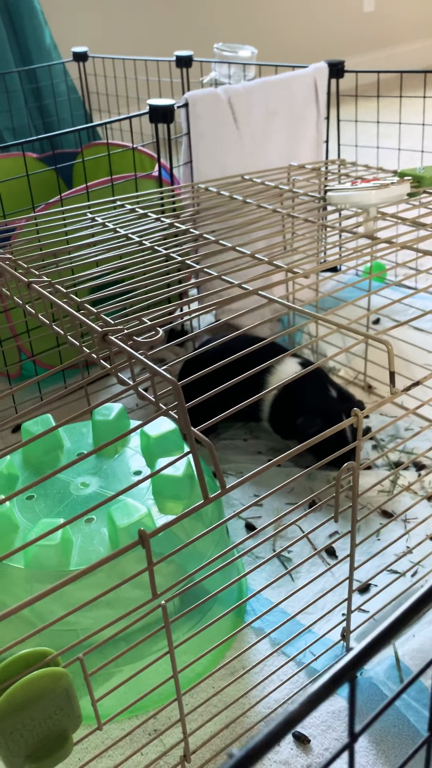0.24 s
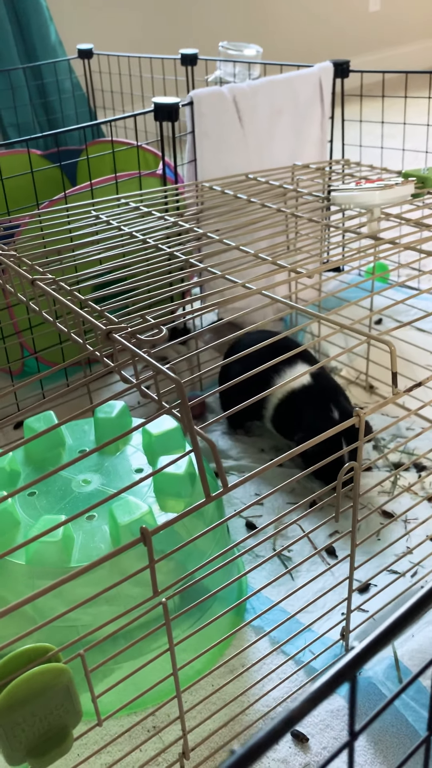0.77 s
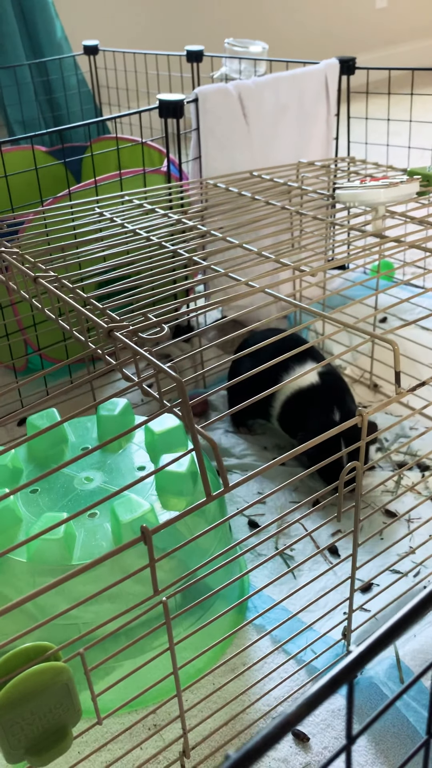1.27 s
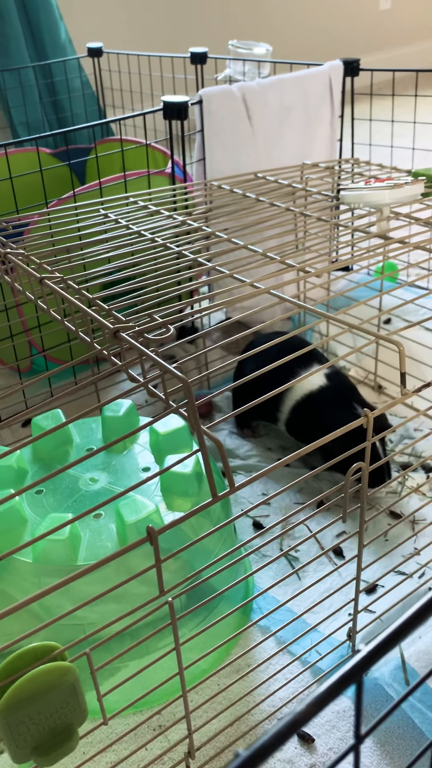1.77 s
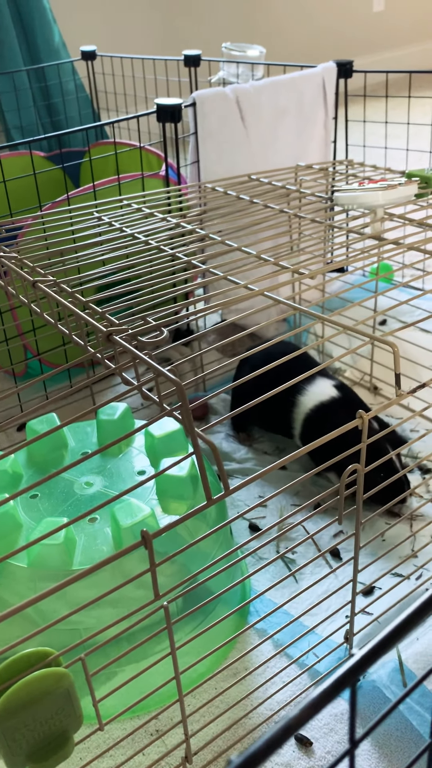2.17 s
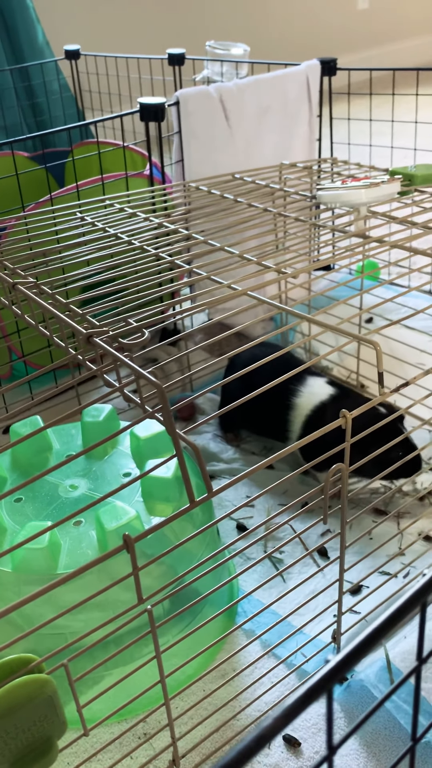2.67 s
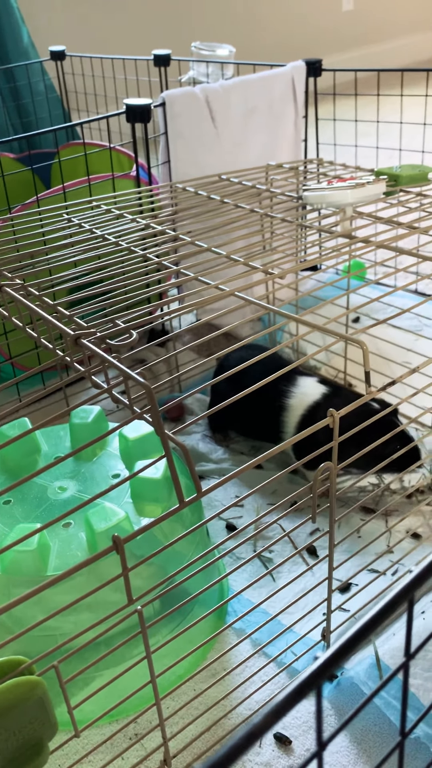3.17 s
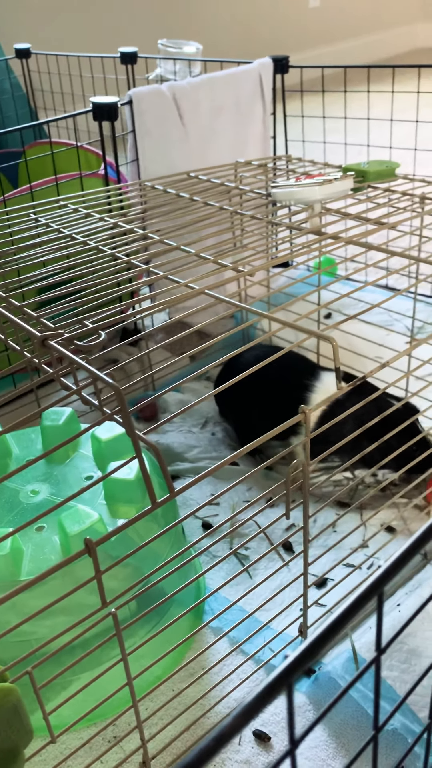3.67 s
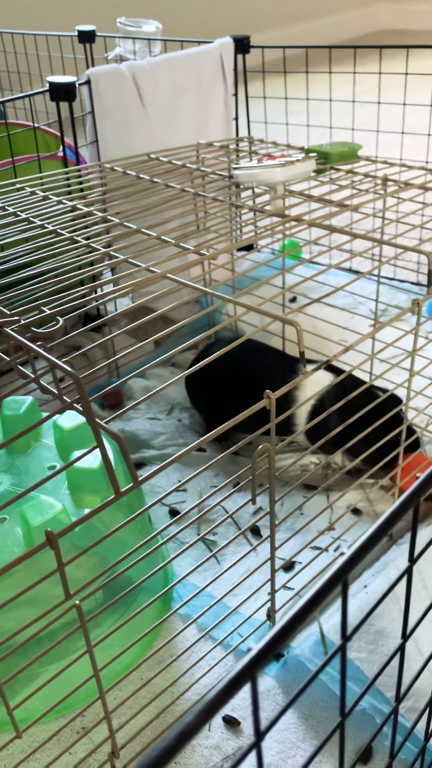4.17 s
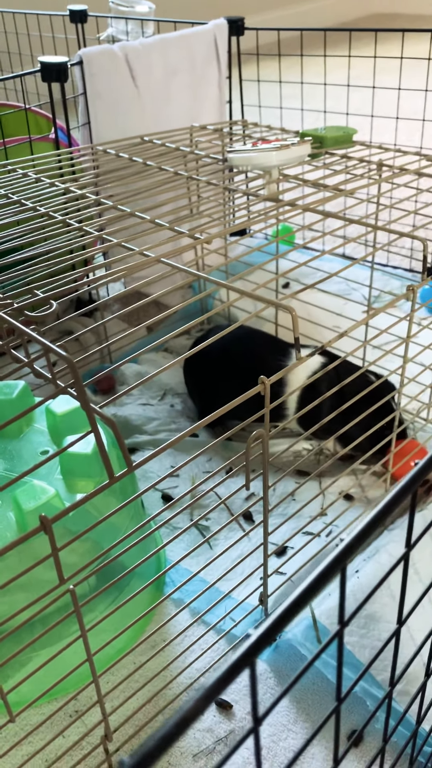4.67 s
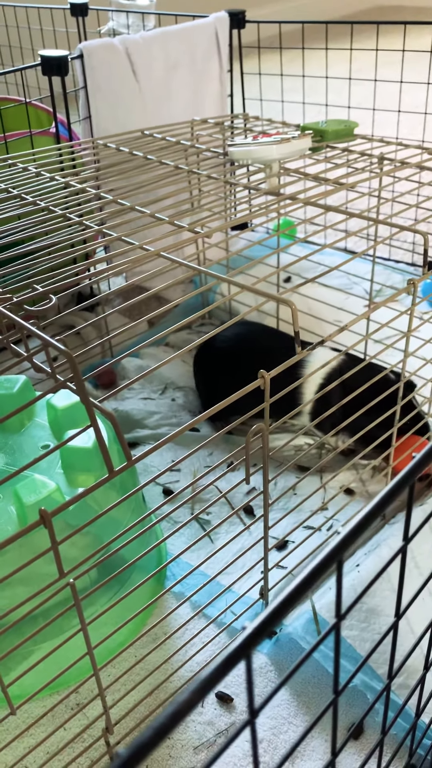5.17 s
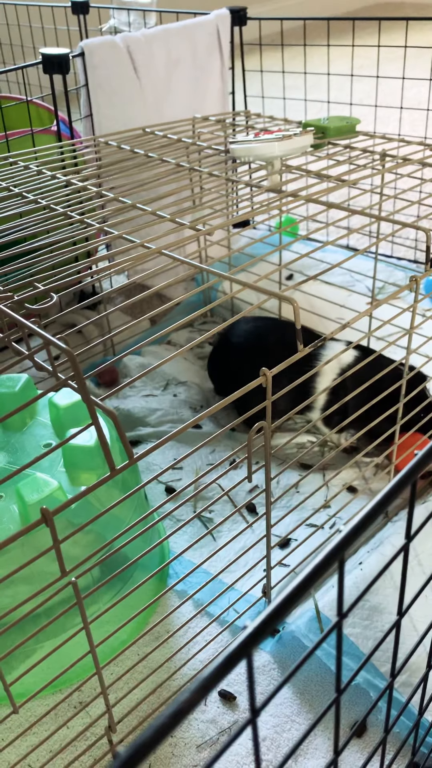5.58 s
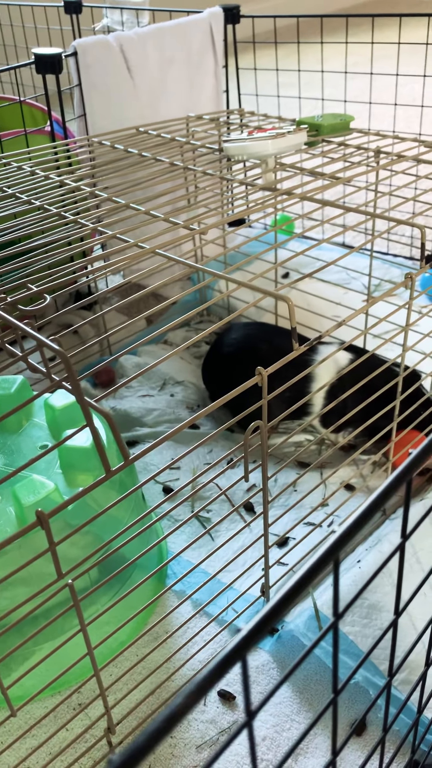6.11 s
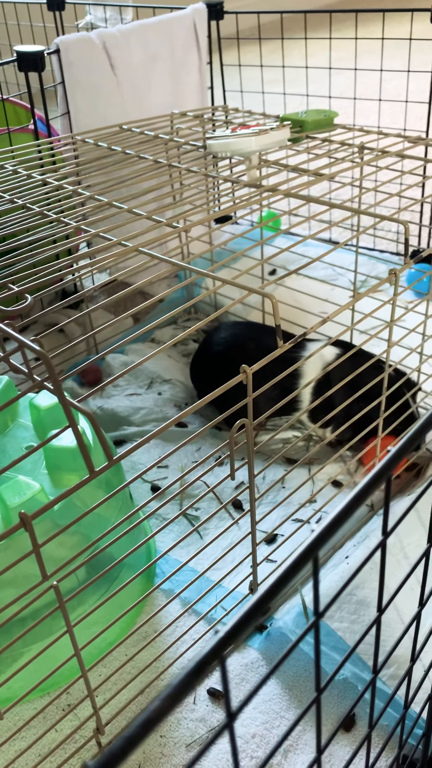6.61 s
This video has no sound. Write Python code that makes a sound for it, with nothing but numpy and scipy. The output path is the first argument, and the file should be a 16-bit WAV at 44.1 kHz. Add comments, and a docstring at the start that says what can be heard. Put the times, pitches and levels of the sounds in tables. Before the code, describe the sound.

Close, delicate hay rustling and stalk snaps come in uneven flurries as a small animal noses about, above a faint deep motor hum.

```python
"""A guinea pig roots through hay on a padded cage floor, heard by a close pair of microphone ports.
A low motor hum and the room's air run throughout. From 0.2 s nose and paws drag stalks (fine fizz, crisp
kinks) and crumple bedding (dull crackle), while single stalks snap and the pad pops: a flurry by 0.8 s,
bursts near 1.2 and 2 s, a lull, the busiest spell from 3.2 to 4.4 s, then more near 5.2 and 6.5 s.
Random stick-slip clicks make the rustle, band-limited releases the snaps, dispersed clicks the pops."""
import sys
import numpy as np
from scipy import signal
from scipy.fft import rfft, irfft
from scipy.io import wavfile
from scipy.ndimage import uniform_filter1d

SR = 44100
rng = np.random.default_rng(int(sys.argv[2]) if len(sys.argv) > 2 else 0)


def master(y):
    """Save y as 16-bit WAV."""
    cut = np.clip(np.atleast_2d(y).T, -1, 1)
    pcm = np.round(cut * 32767)  # scale
    wavfile.write(sys.argv[1], SR, pcm.astype(np.int16))


N = 302085
TIME = np.arange(N) / SR
BINS = np.fft.rfftfreq(N, 1 / SR)
LEAD = 256  # samples of room before a click's peak
SNAP_TOP_HZ = 11900
# lag of 500 Hz behind 2 kHz across the pad, for the bedding and a pop at the reference centre
PAD_LAG_S = 0.003095
IDLE_HAY_DB, IDLE_BEDDING_DB = -87, -87  # the animal is never quite still


# colour of the hay fizz as it reaches the listener: (f/Hz, relative level/dB per Hz)
HAY_COLOUR = [(600, -8.5), (2000, 0), (3200, -10), (4500, -1), (6500, -1.5), (9500, 0), (11300, -2.5),
              (13500, -10), (16000, -2)]


def hay(level_db=0.35, coarse_db=-6.0):
    """Stalks slide over each other: a dense stick-slip fizz with coarser catches."""
    _, _, slide_db, _ = np.transpose(SHOVES)
    fine = slips(per_s=9800, spread_db=1.5)
    coarse = slips(per_s=330, spread_db=2.5)
    grains = unit(fine) + amp(coarse_db) * unit(coarse)
    fizz = shifting(colour(grains, HAY_COLOUR), depth_db=2.0, size=7, count=8)
    return fizz * amp(level_db) * movement(slide_db, IDLE_HAY_DB)


# colour of the crumpling bedding as it reaches the listener: (f/Hz, relative level/dB per Hz)
BEDDING_COLOUR = [(120, -22.5), (350, 9), (550, 2.5), (720, -1.5), (980, 0.5), (1300, -3.5), (1900, -4.5),
                  (2500, -17), (4500, -12.5), (9000, -24)]


def bedding(level_db=2.5):
    """The soft floor crumples under the animal's weight in dull, separate creases."""
    _, _, _, crumple_db = np.transpose(SHOVES)
    clicks = slips(per_s=520, spread_db=0.0)
    creases = colour(bend(clicks, PAD_LAG_S), BEDDING_COLOUR)
    crumple = shifting(creases, depth_db=3.5, size=3, count=7)
    return crumple * amp(level_db) * movement(crumple_db, IDLE_BEDDING_DB)


# each shove of the nose or a paw:
# (t/s, time held/s, sliding hay level/dB, crumpling bedding level/dB), levels before each layer's trim
SHOVES = [(0.21, 0.041, -79.5, -84.5), (0.408, 0.011, -77, -75.5), (0.572, 0.0066, -63.5, -70.5),
          (0.647, 0.027, -61.5, -61), (0.692, 0.03, -85, -68.5), (0.814, 0.011, -69, -69.5),
          (1.167, 0.082, -78, -81), (1.684, 0.012, -78.5, -77.5), (1.807, 0.017, -75.5, -79),
          (1.87, 0.034, -91, -76.5), (1.927, 0.033, -72, -70.5), (2.018, 0.025, -63, -69.5),
          (2.08, 0.012, -68, -88), (2.585, 0.062, -77, -95), (3.225, 0.028, -73, -76),
          (3.32, 0.03, -78, -76.5), (3.37, 0.076, -66.5, -66), (3.408, 0.012, -61.5, -72),
          (3.475, 0.045, -69, -77), (3.534, 0.0025, -58.5, -62.5), (3.59, 0.051, -74, -101),
          (3.682, 0.036, -67, -83), (3.725, 0.022, -91, -67.5), (3.8, 0.3, -88, -88.5),
          (4.081, 0.016, -66.5, -72.5), (4.13, 0.053, -69, -79.5), (4.219, 0.023, -73, -75),
          (4.335, 0.014, -76, -71), (4.97, 0.013, -75, -91), (5.028, 0.038, -71, -78.5),
          (5.115, 0.036, -87, -71.5), (5.2, 0.067, -80, -72), (5.456, 0.0028, -66.5, -66),
          (5.56, 0.058, -66, -71.5), (6.25, 0.37, -88.5, -89.5), (6.46, 0.022, -88, -81),
          (6.597, 0.012, -79, -77)]
RISE_S, SETTLE_S = 0.019, 0.025  # time in which a shove builds by, and dies away by, 10 dB
STIR_DB, STIR_DB_PER_S = -14.5, 97  # neighbouring stalks stir more faintly before and after it
FIDGET_DB = -1


def movement(levels_db, idle_db):
    """Gain of a rustle: each shove builds, holds and settles, over a faint, uneven fidgeting."""
    t = TIME[::64]
    fidget = colour(rng.standard_normal(N), [(1, 0), (8, 0), (40, -90)])[::64]
    power = amp(idle_db + FIDGET_DB * fidget) ** 2
    for (start, held, _, _), db in zip(SHOVES, levels_db):
        before = np.maximum(start - t, 0)
        after = np.maximum(t - start - held, 0)
        power += amp(db - 10 * (before / RISE_S + after / SETTLE_S) ** 2) ** 2
        power += amp(db + STIR_DB - STIR_DB_PER_S * (before + after)) ** 2
    return np.interp(TIME, t, np.sqrt(power))


def crackle(level_db=-2, per_s=125, low_hz=900, high_hz=4600, count=10):
    """Trapped stalks kink one by one during a shove: crisp clicks, each stalk in its own band."""
    _, _, slide_db, crumple_db = np.transpose(SHOVES)
    kinks = np.zeros(N)
    for hz in np.geomspace(low_hz, high_hz, count):
        kink = crack(hz, 2 * hz, splinter=0.1, splinter_s=0.001)
        clicks = slips(per_s / count, spread_db=-1.5)
        kinks += signal.oaconvolve(clicks, kink)[LEAD:LEAD + N]
    gain = movement((slide_db + crumple_db) / 2, IDLE_BEDDING_DB + STIR_DB)
    return amp(level_db) * unit(kinks) * gain


def ticks(per_s=22, over_db=4.0, low_hz=3200):
    """Fine fibres give way at random, as loudly as the hay is being pushed."""
    _, _, slide_db, _ = np.transpose(SHOVES)
    breaks = slips(per_s, spread_db=1.5) * movement(slide_db, IDLE_HAY_DB)
    tick = crack(low_hz, SNAP_TOP_HZ, splinter=0.53, splinter_s=0.001)
    return amp(over_db) * signal.oaconvolve(breaks, tick)[LEAD:LEAD + N]


# dry stalks snapping; thinner stalks start higher, all reach the same top:
# (t/s, tick level/dB as rms over 1 ms before the ports, lowest f/Hz,
#  jolt to the neighbours level/dB re the tick, splintering 0-1)
SNAPS = [(0.6388, -54, 5000, -13, 1), (0.648, -55.5, 5200, -2, 1), (1.1708, -63, 2300, -2, 0.3),
         (1.2156, -61, 3600, -5, 0.7), (1.2208, -55.5, 4000, -4, 0.3), (1.2343, -57, 2200, -11, 0.5),
         (1.5252, -59, 2860, -15, 0.2), (1.5935, -58, 8800, -11, 0.2), (1.736, -63.5, 6200, -6, 0.4),
         (1.992, -67, 2700, -1, 0.3), (2.0107, -49, 4800, -2.5, 0.4), (2.035, -51, 5100, -5, 0.8),
         (2.0655, -52, 6300, -10, .2), (3.288, -68.5, 2500, 9.5, 0.5), (3.37, -61.5, 3000, 6, 0.83),
         (3.39, -51, 3000, -10, 0.7), (3.407, -53.5, 3500, 0, 0.7), (3.5318, -50.5, 3140, 2, 0.5),
         (3.7188, -53.5, 4300, -20, 1), (3.728, -56, 4300, -5, 0.5), (3.8305, -57, 4930, -24, 0.2),
         (4.0962, -59, 5130, -9, 0.2), (4.1585, -58, 6500, -9, .3), (4.232, -62, 2600, 3, .5),
         (4.3375, -57, 4630, -11, 0.7), (5.0273, -59, 6200, -15, 0.5), (5.158, -64, 7550, -7, 0.2),
         (5.2144, -66, 6500, -12, .2), (5.56, -62, 5000, -9, .4), (5.6295, -51.5, 6300, -19, 0.6),
         (5.7523, -69, 3000, 4.5, .1), (6.3193, -59, 9050, -17, 0.16), (6.5703, -64.5, 4960, 3.5, 0.1),
         (6.6783, -54, 8900, -28, 0)]


def snaps(level_db=0.0, jolt_low_hz=1200, jolt_top_hz=7000):
    """Dry stalks break with a thin tick, clean or splintering, and jolt their neighbours lower down."""
    out = np.zeros(N)
    for s, db, low_hz, jolt_db, splinter in SNAPS:
        tick = crack(low_hz, SNAP_TOP_HZ, splinter, splinter_s=0.0015)
        jolt = crack(jolt_low_hz, jolt_top_hz, splinter, splinter_s=0.0036)
        snap = tick + amp(jolt_db) * jolt
        add(out, s - LEAD / SR, amp(db + level_db) * snap)
    return out


# the floor pad popping under a paw: (t/s, level/dB as rms over 1 ms before the ports, centre f/Hz)
POPS = [(0.4038, -60, 1830), (0.417, -63, 1700), (0.581, -69, 1500), (0.6385, -58, 1520),
        (0.648, -57, 1500), (0.6700, -50, 1430), (0.6723, -46, 950), (0.687, -61, 597), (0.736, -66, 1510),
        (0.7767, -62, 980), (0.7937, -52.5, 940), (1.17, -62.5, 1800), (1.234, -52.5, 1740),
        (1.696, -65, 1400), (1.893, -67, 900), (1.926, -66, 1640), (1.9745, -51.5, 1430),
        (1.977, -49.5, 646), (2.0123, -56, 1690), (2.037, -61, 950), (2.0675, -61, 1000),
        (2.659, -65, 1050), (2.678, -65, 1410), (3.223, -63, 1580), (3.369, -65, 1590), (3.4113, -44, 890),
        (3.4208, -52, 1180), (3.43, -50, 990), (3.4498, -53, 1080), (3.5144, -51.5, 1970),
        (3.5344, -44, 640), (3.7184, -44.5, 1160), (3.7287, -49, 1370), (4.0885, -60, 1090),
        (4.097, -59, 1250), (4.1895, -68, 1260), (4.23, -60.5, 2030), (4.3245, -72, 1690),
        (5.06, -65, 1630), (5.0945, -57.5, 1190), (5.126, -58, 1300), (5.1327, -57, 1260),
        (5.1565, -62, 1070), (5.1955, -62, 840), (5.208, -56, 625), (5.219, -53, 527), (5.2432, -55, 1590),
        (5.4495, -66, 1050), (5.4622, -53.5, 1230), (6.456, -64.5, 930), (6.478, -69, 930),
        (6.589, -58, 2230), (6.606, -69, 1320)]
# colour of a pop centred on POP_CENTRE_HZ: (f/Hz, relative level/dB per Hz)
POP_COLOUR = [(120, -21), (380, -8), (900, 5.5), (1400, -2), (2000, -8), (2800, -21), (12000, -45)]
POP_CENTRE_HZ = 1000


def pops(level_db=0.0):
    """The pad buckles under a paw: a papery knock that falls in pitch within a few milliseconds."""
    out = np.zeros(N)
    for s, db, hz in POPS:
        dullness = POP_CENTRE_HZ / hz
        push = release(splinter=0.1, splinter_s=0.003)
        push_hz = np.fft.rfftfreq(len(push), 1 / SR)
        shape = amp(read(POP_COLOUR, push_hz * dullness))
        knock = irfft(rfft(push) * shape)
        # duller pops come from farther across the pad and lag more
        knock = bend(knock, PAD_LAG_S * np.sqrt(dullness))
        add(out, s - LEAD / SR, amp(db + level_db) * per_ms(knock))
    return out


# phase by which the left channel leads the right: (f/Hz, phase/rad), negative where it trails
CHANNEL_LEAD = [(100, 0), (1000, -.5), (2150, .25), (2600, 2), (4100, 2), (5000, 3.1), (7500, 6.1),
                (9300, 6.6), (11300, 9.2), (13000, 9.7), (15000, 12.4)]


def ports(x, room_db, room_t60, count=5):
    """Sets the two channels' phases apart by frequency, over faint pen and room reflections unlike at each."""
    half_lead = np.outer([.5, -.5], read(CHANNEL_LEAD, BINS))
    out = irfft(rfft(x) * np.exp(1j * half_lead), N)
    t = TIME[:SR // 5]
    # the reflections change as the sound comes from one spot of the floor after another
    spot = TIME * 14  # spots per second
    for k in range(count):
        away = abs((spot - k + count / 2) % count - count / 2)
        share = np.cos(np.pi / 2 * np.minimum(away, 1))
        decay = amp(-60 * t / room_t60) * (t > .002)
        taps = rng.standard_normal((2, len(t))) * decay
        taps /= np.linalg.norm(taps, axis=1, keepdims=True)
        out += amp(room_db) * signal.oaconvolve((x * share)[None], taps, axes=1)[:, :N]
    return out


# steady tones of a motor in the room, levels before waver and port balance:
# (f/Hz, rms level/dB, waver of level/dB, waver of phase/rad)
HUM = [(39.6, -64, 2, 0.74), (79.53, -62, 4, 0.12), (120.07, -45.5, 0.23, .13), (241, -70, 1.5, 0.32),
       (361.6, -80, 2, 0.94), (426, -78.5, 2.5, 0.3)]


def hum():
    """Motor tones; the strong one is nearly steady, the faint ones waver in level and phase."""
    out = np.zeros(N)
    slow = [(1, 0), (4, -12), (20, -90)]  # colour of the wavering
    for hz, db, waver_db, drift in HUM:
        swell = colour(rng.standard_normal(N), slow)
        wander = colour(rng.standard_normal(N), slow)
        phase = 2 * np.pi * (hz * TIME + rng.random()) + drift * wander
        out += np.sqrt(2) * amp(db + waver_db * swell) * np.sin(phase)
    return out


# colour of the room's air: (f/Hz, relative level/dB per Hz)
AIR_COLOUR = [(8, -12.5), (25, 1), (105, 0.5), (150, -6), (210, -9.5), (270, -7), (310, -12.5),
              (400, -17.5), (600, -29.5), (1200, -43.5), (2500, -46), (5000, -53), (10000, -51),
              (15500, -53)]
AIR_DB = -54.5  # rms over both ports
# likeness of the room's air at the two ports: (f/Hz, coherence -1 to 1)
AIR_LIKENESS = [(20, 1), (130, 0.95), (290, 0.78), (600, -0.35), (900, -0.85), (1750, -0.8), (3100, -0.046),
                (7500, 0.91), (13000, -0.93)]


def air(waver_db=2.0):
    """Deep rumble alike at both ports, its upper part wavering; higher noise alike or opposite by band."""
    shared, apart = rfft(rng.standard_normal((2, N)))
    likeness = np.clip(read(AIR_LIKENESS, BINS), -1, .998)
    pair = shared * np.sqrt(1 + likeness) + np.outer([1, -1], apart * np.sqrt(1 - likeness))
    noise = irfft(pair * amp(read(AIR_COLOUR, BINS)), N)
    hz, _, z = signal.stft(noise, SR, nperseg=2048)
    patches = uniform_filter1d(rng.standard_normal(z.shape[1:]), size=3, axis=0)
    patches = unit(uniform_filter1d(patches, size=6, axis=1))
    upper = np.interp(hz, [150, 220, 500, 1000], [0, 1, 1, 0])[:, None]
    wavering = signal.istft(z * amp(waver_db * patches * upper), nperseg=2048)[1][:, :N]
    return amp(AIR_DB) * unit(wavering)


def slips(per_s, spread_db):
    """Random stick-slip clicks of either sign; positive spread makes a few large, negative a few small."""
    size = amp(spread_db * np.minimum(rng.exponential(1, N), 3.5))
    return size * rng.choice([-1., 1.], N) * (rng.random(N) < per_s / SR)


def shifting(x, depth_db, size, count):
    """Contact passes from fibre to fibre: colour shifts in patches of size bins by count frames."""
    z = signal.stft(x, nperseg=256)[2]
    patches = uniform_filter1d(rng.standard_normal(z.shape), size, 0)
    patches = np.clip(unit(uniform_filter1d(patches, count, 1)), -2, 2)
    return unit(signal.istft(z * amp(depth_db * patches), nperseg=256)[1][:N])


def release(splinter, splinter_s):
    """One click; a share of its energy is a short noise burst, rising twice as steeply as it fades."""
    n = np.arange(2048) - LEAD
    burst = rng.standard_normal(len(n)) * np.exp(-np.maximum(n, -2 * n) / SR / splinter_s)
    share = np.clip(splinter, 0, 1)
    return np.sqrt(1 - share) * (n == 0) + np.sqrt(share) * burst / np.linalg.norm(burst)


def crack(low_hz, top_hz, splinter, splinter_s):
    """A release ringing in a band."""
    edges = [min(low_hz, top_hz * .85), min(top_hz, SR * .42)]
    band = signal.butter(2, edges, "bandpass", fs=SR, output="sos")
    return per_ms(signal.sosfilt(band, release(splinter, splinter_s)))


def bend(x, lag_s):
    """Bending waves cross the pad faster the higher they are: a click becomes a short falling chirp."""
    hz = np.fft.rfftfreq(len(x), 1 / SR)
    turns = lag_s * (2 * np.sqrt(2000 * hz) - hz)  # its slope is the delay: 0 at 2 kHz, lag_s at 500 Hz
    return irfft(rfft(x) * np.exp(-2j * np.pi * turns), len(x))


def amp(db):
    """Decibels to gain."""
    return 10 ** (np.asarray(db) / 20)


def unit(x):
    """Scales to rms 1."""
    return x / np.sqrt(np.mean(x ** 2) + 1e-20)


def per_ms(x):
    """Scales a short sound so its energy equals rms 1 over a millisecond."""
    return x / np.linalg.norm(x) * np.sqrt(SR / 1000)


def read(points, hz):
    """Reads a table on a log-frequency axis."""
    f, value = np.transpose(points)
    return np.interp(np.log(hz + 1), np.log(f + 1), value)


def colour(x, spectrum):
    """Weights x by a spectrum, at rms 1."""
    return unit(irfft(rfft(x) * amp(read(spectrum, BINS)), N))


def add(mix, s, sound):
    """Mixes a sound in at time s."""
    part = mix[max(round(s * SR), 0):][:len(sound)]
    part += sound[:len(part)]


def scene():
    """The animal close to the ports, over the room's hum and air."""
    balance = amp([[.15], [-.15]])  # the hum is a touch stronger at the left port
    room = hum() * balance + air()
    rustle = ports(hay() + bedding(), room_db=-8, room_t60=.1)
    clicks = ports(snaps() + ticks() + crackle() + pops(), room_db=-11.5, room_t60=0.065)
    return rustle + clicks + room


EDGE_HZ = 15900


def record(dry):
    """The recorder's band limit: a steep low-pass at EDGE_HZ."""
    low_pass = signal.firwin(511, EDGE_HZ, window=("kaiser", 9), fs=SR)
    return signal.oaconvolve(dry, low_pass[None], "same")


dry = scene()
out = record(dry)
master(out)
```